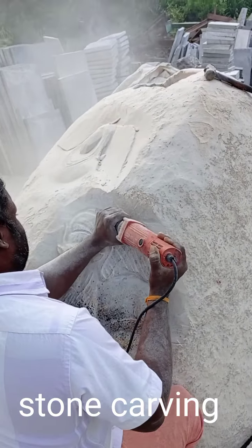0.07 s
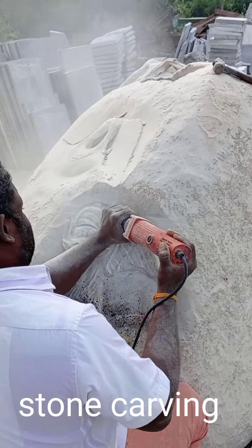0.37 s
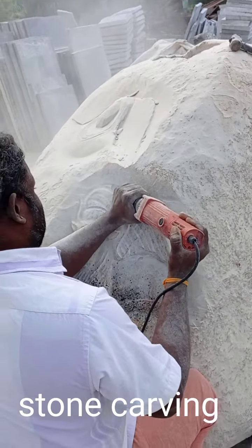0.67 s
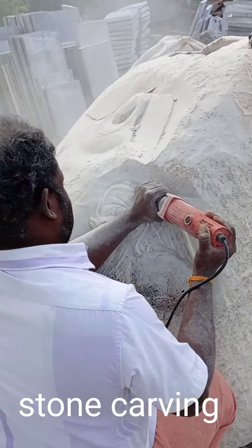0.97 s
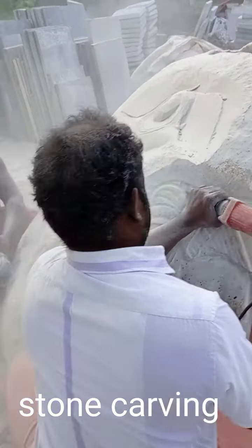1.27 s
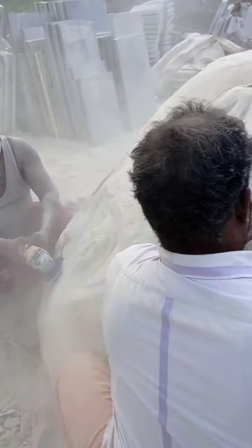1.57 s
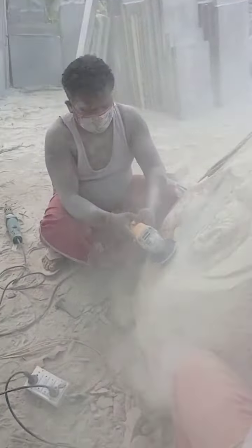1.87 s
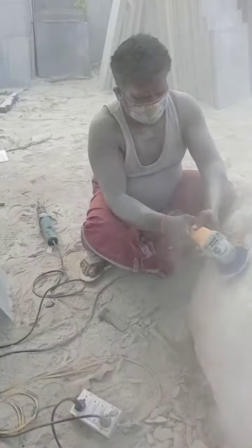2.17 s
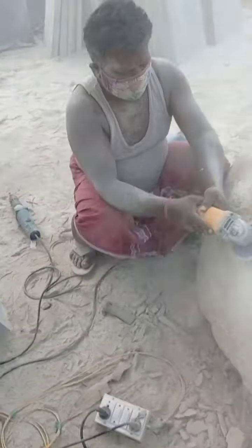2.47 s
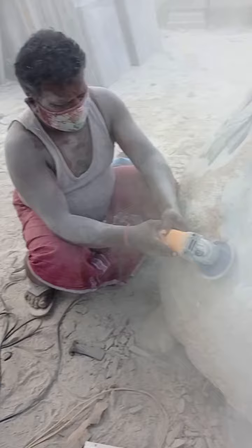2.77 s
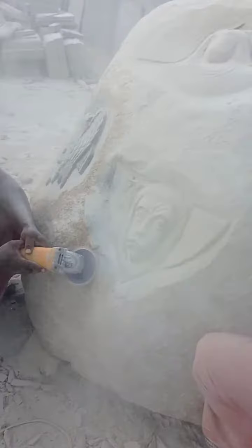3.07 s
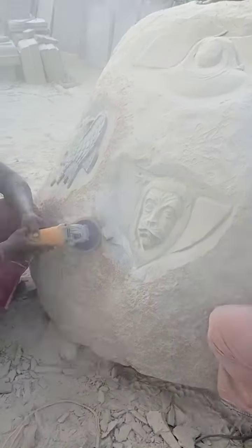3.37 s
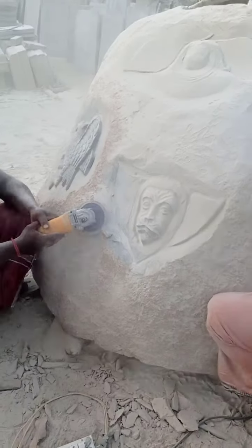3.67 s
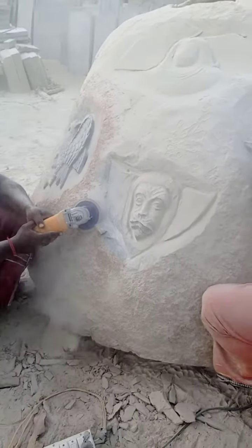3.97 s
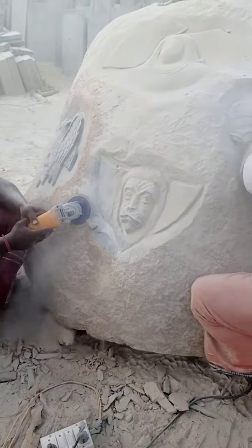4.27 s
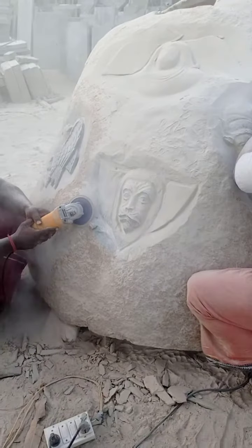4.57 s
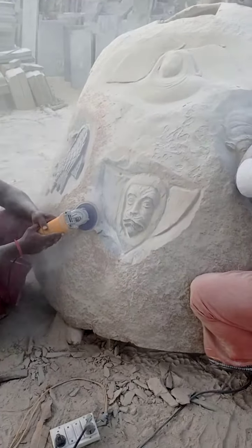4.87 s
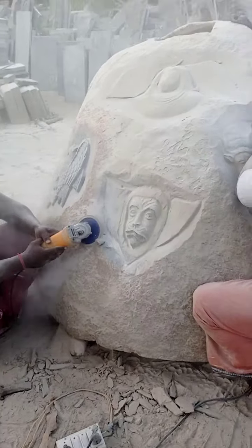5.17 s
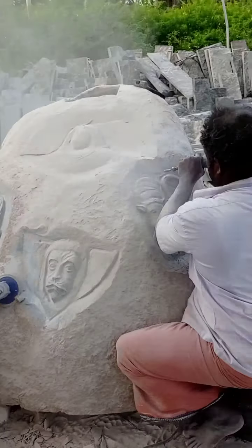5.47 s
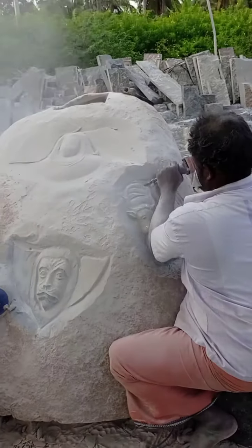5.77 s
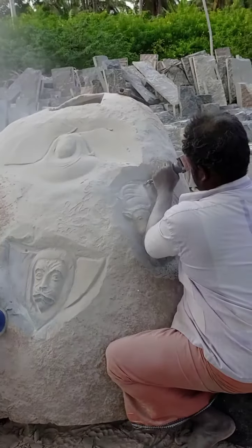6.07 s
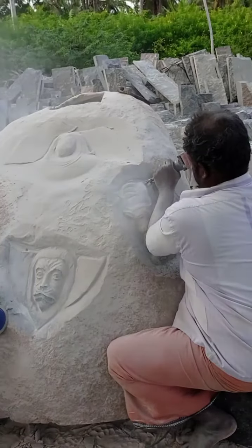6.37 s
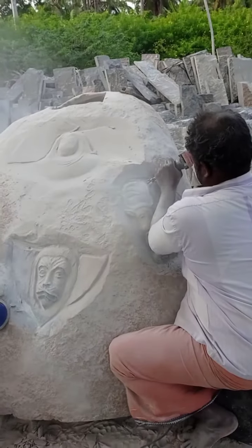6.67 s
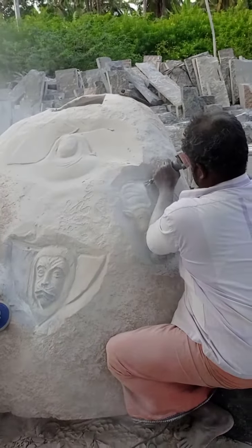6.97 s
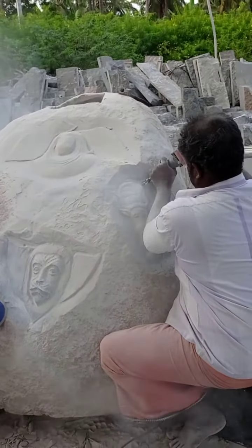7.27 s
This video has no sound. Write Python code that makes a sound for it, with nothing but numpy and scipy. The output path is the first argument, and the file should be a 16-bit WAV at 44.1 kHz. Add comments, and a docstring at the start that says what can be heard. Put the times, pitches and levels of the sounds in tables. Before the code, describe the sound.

Electric angle grinders whine and scrape on a boulder outdoors, with squealing discs and gritty dust spraying against the microphone.

```python
"""A small angle grinder whines close by, over a main one scraping a boulder and a third further off.
The phone walks round the stone carvers in an open yard: after a second it leaves the small grinder
and enters the main one's spray of dust and air. Motors and gears whine and sag under load;
the pressure of the disc on the stone drives the scrape, the ring of the disc and the spray."""
import sys
import numpy as np
from scipy import signal
from scipy.fft import rfft, irfft
from scipy.io import wavfile
from scipy.ndimage import uniform_filter1d, map_coordinates

SR = 44100
rng = np.random.default_rng(int(sys.argv[2]) if len(sys.argv) > 2 else 0)


def to_wav(sig):
    """Store sig (one row per channel, or 1-D mono) as 16-bit WAV at the path in sys.argv[1].

    Samples outside -1..1 are clipped; the rate is SR.
    """
    pcm = np.clip(np.atleast_2d(sig), -1, 1) * 32767
    pcm = np.round(pcm).astype(np.int16)
    wavfile.write(sys.argv[1], SR, pcm.T)  # frames by channels


N = 332073
T = np.arange(N) / SR
FREQ_HZ = np.maximum(np.arange(N // 2 + 1) * SR / N, 1)

# small grinder's motor: (time [s], speed [Hz], relative level [dB])
SMALL_MOTOR = [(0, 359, -36), (.2, 356.2, -35), (.6, 351.2, -34), (.92, 349.5, -36), (1.08, 353.6, -38.5),
               (1.4, 347.5, -39.5), (1.6, 346.5, -46)]
# its tones: (multiple of motor speed, relative level [dB])
SMALL_ORDERS = [(1, -29), (2, -21.5), (3, -17), (4, -0.5), (5, -16), (6, -0.5), (7, -4), (7.4, -7),
                (7.9, -1), (12, -10), (21, -25)]
# its fan: (frequency [Hz], relative level [dB])
FAN_SPECTRUM = [(40, -40), (110, -28.5), (240, -27.5), (450, -20), (620, -14.5), (1020, -5.5), (1200, -12),
                (1400, 1.5), (1900, -1), (3900, 0), (4800, -8), (5800, 1.5), (6900, -7.5), (8400, -38),
                (12000, -23)]
# that fan, falling into the boulder's shadow: (time [s], level [dB])
FAN_LEVEL = [(0, -30), (1.2, -30.5), (1.8, -42.5), (7.53, -41.5)]

# main grinder's drive: (time [s], motor speed [Hz], gear whine level [dB])
MAIN_DRIVE = [(0, 375, -42.5), (.42, 373.5, -34.5), (.9, 368, -29), (1.4, 363.5, -28.5),
              (1.7, 364.5, -25.5), (2.05, 360.5, -33), (2.4, 362, -24), (2.75, 364.5, -29),
              (3.15, 369.7, -30.5), (3.5, 375, -37), (3.8, 371.5, -26.5), (4.65, 367.5, -29),
              (5.3, 366.3, -28), (5.68, 364.5, -30.5), (5.95, 366, -28.5), (6.25, 372.3, -30),
              (6.95, 373, -31.5), (7.53, 368.8, -34)]
# its motor whine: (time [s], level [dB])
MOTOR_LEVEL = [(0, -42), (1.15, -40.5), (1.6, -36.5), (2.7, -40.5), (3.5, -36.5), (4.1, -41.5),
               (4.7, -40.5), (5.5, -42.5), (6.2, -45), (6.45, -38.5), (7.53, -39)]
# its gear and motor tones: (multiple of motor speed, relative level [dB])
GEAR_ORDERS = [(18, 2), (36, -31), (40, -20)]
MOTOR_ORDERS = [(7, -3), (11, -4.5), (14, 1.5), (21, 0.5), (23, -19), (25.6, -13)]
# carver's lean on the disc: (time [s], pressure [dB])
LEAN = [(0, -6.5), (.9, -2.5), (1.45, 2), (2.0, 3.5), (2.8, 2), (2.88, -3), (3.42, -2.5), (3.445, 2.5),
        (4.2, 0.5), (4.6, -1.5), (5.0, .5), (5.6, -3), (5.95, 0), (6.2, -3.5), (6.5, -0.5), (7.53, 0.5)]
# disc skips clear: (start [s], length [s], pressure drop [dB], further spray drop [dB])
LIFTS = [(2.906, 0.018, 2.5, 2), (3.056, 0.042, 3.5, 2), (3.202, 0.072, 2.5, 1.5), (3.296, 0.14, 3, 1.5),
         (3.489, 0.019, 4.5, 3.5), (3.594, 0.094, 2.5, 2), (4.23, 0.059, 7, 0), (4.29, 0.061, 1.5, 4),
         (5.559, 0.028, 1.5, 7), (5.646, 0.07, 2.5, 2), (6.055, 0.2, 3.5, 1.5), (6.316, 0.041, 2, 3)]
# grit on stone, with a thin hiss near 14.8 kHz from the microphone port:
# (frequency [Hz], relative level [dB])
SCRAPE_SPECTRUM = [(100, -70), (500, -24.5), (1500, -9.5), (2300, -3), (3800, -1), (4700, -4.5), (5800, 0),
                   (6400, 3.5), (6950, -18.5), (7450, -3.5), (9000, -5), (10600, -8), (12000, -24),
                   (13800, -16), (14800, -6)]

# disc modes, grouped as they ring together: (frequency [Hz], width [Hz], relative level [dB])
LOWEST_MODES = [(2396, 235, 0)]
SECOND_MODES = [(2593, 98, -1), (2774, 660, -9.5)]
MIDDLE_MODES = [(3244, 24, 6), (3310, 310, -6)]
SQUEAL_MODES = [(3545, 90, 13.5), (3870, 1100, -21), (4135, 260, -9.5)]
HIGH_MODES = [(6700, 190, -0.74), (6970, 550, 1.2)]
# rim angle favours one group: (centre [s], half width [s], group, gain [dB])
MODE_SWELLS = [(.11, .03, "lowest", 15), (1.3, 0.17, "lowest", 6.5), (3.574, 0.27, "lowest", 12),
               (4.54, 0.61, "lowest", 13), (6.848, .22, "lowest", 8), (7.35, 0.16, "lowest", 3),
               (.17, .04, "second", 7), (1.219, 0.23, "second", 6.5), (1.326, .025, "second", 10.5),
               (7.35, 0.26, "second", 2.5), (1.9, 0.41, "second", 3.5), (3.65, 1, "second", 6.5),
               (4.95, 0.54, "second", 5), (1.701, 0.31, "middle", 4), (2.5, 0.28, "middle", 7),
               (3.33, 0.56, "middle", 6.5), (6.5, 0.66, "middle", 6), (1.151, .3, "squeal", 2),
               (2.725, 0.27, "squeal", 5.5), (3.833, 0.23, "squeal", 6.5), (4.547, 0.23, "squeal", 8.5),
               (5.123, 0.38, "squeal", 10.5), (5.797, 0.34, "squeal", 6.5), (6.756, 0.31, "squeal", 5),
               (7.403, 0.26, "squeal", 9), (1.678, 0.41, "high", 5.5), (2.601, 0.2, "high", 7),
               (3.838, 0.92, "high", 7), (4.653, 0.19, "high", 8)]

# far grinder: (time [s], whine [Hz], upper partials' level [dB])
FAR_WHINE = [(0, 5460, -46), (.75, 5490, -38), (1.45, 5545, -29), (2.05, 5660, -42), (2.55, 5595, -36),
             (3.0, 5470, -56), (3.6, 5450, -56), (4.2, 5500, -34), (5.0, 5540, -36.5), (5.3, 5550, -26.5),
             (5.6, 5537, -30), (6.0, 5520, -32.5), (6.45, 5440, -43), (7.53, 5525, -51)]
# its upper partials: (multiple of whine frequency, relative level [dB])
FAR_PARTIALS = [(1.153, 0), (1.466, -11), (1.628, -17), (2.06, -24)]
# its disc catches: (centre [s], half width [s], gain [dB])
FAR_FLARES = [(.55, 0.28, 8), (2.15, 0.48, 10), (2.747, 0.22, 7), (3.95, .15, 5), (5.55, 0.29, 13),
              (5.966, .11, 15.5), (6.464, 0.14, 11)]

# disc squeals and flares of the grinders' motor and gear whine:
# (centre [s], half width [s], frequency [Hz], level [dB])
BRIEF_TONES = [(0.4, 0.036, 1393, -32), (0.423, .1, 5260, -33), (1.059, 0.028, 6600, -21),
               (1.898, 0.53, 2600, -32.5), (2.25, 0.085, 5060, -25.5), (2.677, 0.23, 4030, -32),
               (2.868, 0.068, 5130, -32), (4.603, 0.036, 3500, -25.5), (6.85, 0.14, 5260, -38)]
# how squarely the spray meets the phone: (time [s], gain [dB])
SPRAY_AIM = [(0, -27), (1.1, -10), (1.4, -4), (1.95, -2.5), (2.3, 2), (2.8, 3), (2.84, 1.5), (3.5, -2),
             (4.1, -0.5), (4.6, 0.5), (5.0, 1), (6.2, -.5), (7.53, -1)]
# dust and air hitting the phone: (frequency [Hz], relative level [dB])
DUST_SPECTRUM = [(60, -35), (300, -8), (700, -1), (1300, 0), (1900, -4.5), (3000, -5.5), (6000, -7.5),
                 (11000, -18), (13500, -15), (14800, -10.5)]
AIR_SPECTRUM = [(20, -31), (45, -15), (70, -8), (110, -2), (300, -0.5), (600, -3), (1200, -16.5),
                (3000, -36)]
# right channel's phase lead over the left, bass centred: (frequency [Hz], phase [rad])
STEREO_PHASE = [(0, 0), (450, .01), (750, .08), (1800, .1), (2500, .36), (6600, .95), (10500, 1.5),
                (15000, 2.15)]


def undb(db):
    """Decibels to gain."""
    return 10 ** (np.asarray(db) / 20)


def unit(x):
    """Scale to rms 1."""
    return x / np.std(x)


def curves(table):
    """Columns of a timed table, per sample."""
    time_s, *columns = np.transpose(table)
    return [np.interp(T, time_s, column) for column in columns]


def bell(centre_s, half_s):
    """Gaussian rise to 1 and fall."""
    return np.exp(-np.minimum(((T - centre_s) / half_s) ** 2, 20))


def gate(start_s, length_s, edge_s=0.007):
    """1 inside the span, with linear edges."""
    return np.clip(.5 + np.minimum(T - start_s, start_s + length_s - T) / edge_s, 0, 1)


def colour(x, spectrum):
    """Filter by (Hz, dB) points; rms 1."""
    hz, db = np.transpose(sorted(spectrum))
    response = undb(np.interp(np.log(FREQ_HZ), np.log(hz), db))
    return unit(irfft(rfft(x) * response, N))


def walk(rate_hz):
    """Random drift, low-passed at rate_hz; rms 1."""
    lowpass = signal.butter(2, rate_hz, fs=SR / 20, output="sos")
    coarse = signal.sosfilt(lowpass, rng.standard_normal(N // 20 + 2))
    return unit(np.interp(np.arange(N) / 20, np.arange(len(coarse)), coarse))


def shaft_rad(hz):
    """Angle of a shaft spinning at hz."""
    return 2 * np.pi * np.cumsum(hz) / SR


def grains(per_s, spread_db):
    """Dense random impacts of uneven size."""
    hits = rng.random(N) < per_s / SR
    return unit(hits * rng.standard_normal(N) * undb(spread_db * rng.standard_normal(N)))


def whine(hz, orders, jitter, jitter_hz, flutter_db, flutter_hz, smear_rad):
    """Tones locked to a shuddering shaft; each flutters and smears as the tool shakes."""
    angle_rad = shaft_rad(hz * (1 + jitter * walk(jitter_hz)))
    tones = np.zeros(N)
    for order, db in orders:
        flutter = undb(flutter_db * walk(flutter_hz))
        tone = np.sin(order * angle_rad + smear_rad * walk(flutter_hz))
        tones += undb(db) * unit(flutter * tone)
    return tones


def small_grinder():
    """Lightly loaded motor and fan; the boulder cuts off the whine and shadows the fan."""
    motor_hz, motor_db = curves(SMALL_MOTOR)
    in_view = np.interp(T, [1.2, 1.8], [1, 0])
    motor = whine(motor_hz, SMALL_ORDERS, jitter=0.0024, jitter_hz=40.6,
                  flutter_db=2.5, flutter_hz=30, smear_rad=0.37)
    motor *= undb(motor_db - 1 + walk(7.2))
    fan = colour(rng.standard_normal(N), FAN_SPECTRUM) * undb(curves(FAN_LEVEL)[0])
    return in_view * motor + fan


def main_grinder(gear_ratio=3):
    """Geared disc on stone: it bites harder once a turn and chatters over the rough face."""
    motor_hz, gear_db = curves(MAIN_DRIVE)
    press_db = pressure_db()
    drive = drive_whine(motor_hz, gear_db)
    bite = undb(0.61 * np.sin(shaft_rad(motor_hz / gear_ratio)) + 1.13 * walk(40))
    return drive + scrape(bite, press_db) + disc_ring(bite, press_db) + spray(bite, press_db)


def pressure_db(rock_db=0.86, rock_hz=14):
    """The carver's lean and rocking hand, less the moments the disc skips clear."""
    lift_db = sum(drop_db * gate(start_s, length_s) for start_s, length_s, drop_db, _ in LIFTS)
    return curves(LEAN)[0] + rock_db * walk(rock_hz) - lift_db


def drive_whine(motor_hz, gear_db, free_speed_hz=376, full_sag_hz=15):
    """Gear and motor tones, rougher as the speed sags under load."""
    load = np.clip((free_speed_hz - motor_hz) / full_sag_hz, 0, 1)
    gears = whine(motor_hz, GEAR_ORDERS, jitter=0.001617, jitter_hz=45.2,
                  flutter_db=3.0, flutter_hz=38.6, smear_rad=0.54 + 0.59 * load)
    gears *= undb(gear_db + walk(4.2))
    motor = whine(motor_hz, MOTOR_ORDERS, jitter=0.001525, jitter_hz=49.7,
                  flutter_db=4.5, flutter_hz=24.7, smear_rad=0.72 + 0.71 * load)
    motor *= undb(curves(MOTOR_LEVEL)[0] + 1.6 * walk(2.7))
    return gears + motor


def scrape(bite, press_db):
    """Grit strikes the stone, with a thin microphone-port hiss on top; amplitude follows pressure."""
    grit = bite * grains(per_s=25000, spread_db=1.6)
    return colour(grit, SCRAPE_SPECTRUM) * undb(press_db - 28.5)


def mode_ring(bite, modes, limiting, drift_ms):
    """Grit drives a group of disc modes; friction limits their swing, uneven contact bends their pitch."""
    response = sum(undb(db) / (1 + (2 * (FREQ_HZ - hz) / width_hz) ** 2) for hz, width_hz, db in modes)
    radiation = 1 / (1 + (1200 / FREQ_HZ) ** 3)  # a small disc radiates no bass
    grit = bite * grains(per_s=12000, spread_db=1.7)
    ring = unit(irfft(rfft(grit) * response * radiation, N))
    swing = np.sqrt(np.abs(uniform_filter1d(ring ** 2, size=900)) + 0.024)
    read_at = np.arange(N) + drift_ms * SR / 1000 * walk(4.36)  # drifting delay bends pitch
    return unit(map_coordinates(ring / swing ** limiting, [read_at], order=3, mode="reflect"))


def disc_ring(bite, press_db):
    """Each mode group rings with pressure, wavers and swells when the rim favours it."""
    def group(name, modes, limiting, drift_ms, base_db, waver_db):
        ring = mode_ring(bite, modes, limiting, drift_ms)
        swell_db = sum(db * bell(centre_s, half_s)
                       for centre_s, half_s, favoured, db in MODE_SWELLS if favoured == name)
        return ring * undb(base_db + 0.63 * press_db + swell_db + waver_db * walk(13.8))

    return (group("lowest", LOWEST_MODES, limiting=0.092, drift_ms=0.095, base_db=-43.5, waver_db=2.5)
            + group("second", SECOND_MODES, limiting=0.082, drift_ms=0.318, base_db=-35, waver_db=1.5)
            + group("middle", MIDDLE_MODES, limiting=0.25, drift_ms=0.22, base_db=-34.5, waver_db=1.7)
            + group("squeal", SQUEAL_MODES, limiting=0.55, drift_ms=0.242, base_db=-34, waver_db=1.5)
            + group("high", HIGH_MODES, limiting=0.1, drift_ms=0.132, base_db=-37.5, waver_db=1))


def far_grinder(base_db=-43.5, waver_db=2.5):
    """Another carver's tool: only its whine carries, flaring as the disc catches."""
    whine_hz, upper_db = curves(FAR_WHINE)
    flare_db = sum(db * bell(centre_s, half_s) for centre_s, half_s, db in FAR_FLARES)
    lower_db = base_db + waver_db * walk(27) + flare_db
    lower = whine(whine_hz, [(1, 0)], jitter=0.00134, jitter_hz=60,
                  flutter_db=3.0, flutter_hz=30.2, smear_rad=1.0)
    upper = whine(whine_hz, FAR_PARTIALS, jitter=0.00155, jitter_hz=59.6,
                  flutter_db=3.5, flutter_hz=30, smear_rad=0.56)
    return lower * undb(lower_db) + upper * undb(upper_db)


def brief_tones():
    """Brief swelling tones: disc squeals and flares of the grinders' motor and gear whine."""
    shudder_rad = 0.79 * walk(58)
    flutter = undb(2.5 * walk(45))
    tones = sum(np.sin(2 * np.pi * hz * T + shudder_rad) * undb(db) * bell(centre_s, half_s)
                for centre_s, half_s, hz, db in BRIEF_TONES)
    return np.sqrt(2) * flutter * tones


def spray(bite, press_db):
    """Dust and air flung off the rim hit the phone once it has rounded the boulder."""
    starved_db = sum(drop_db * gate(start_s, length_s) for start_s, length_s, _, drop_db in LIFTS)
    flow_db = 1.33 * press_db + curves(SPRAY_AIM)[0] - starved_db
    dust = colour(bite * grains(per_s=4500, spread_db=2.35), DUST_SPECTRUM)
    air = colour(bite * grains(per_s=2500, spread_db=1.8), AIR_SPECTRUM)
    air_fade_db = .85 * np.minimum(flow_db + 3.5, 0)  # buffeting dies faster than dust
    return dust * undb(flow_db - 37) + air * undb(flow_db - 44.5 + air_fade_db)


def yard_scatter(x, t60_s, wet_db):
    """Stacked slabs scatter the treble back, differently on each side."""
    time_s = T[:8000]
    tails = rng.standard_normal((2, len(time_s))) * undb(-60 * time_s / t60_s) * (time_s > .004)
    tails /= np.sqrt(np.sum(tails ** 2, axis=1, keepdims=True))
    treble = irfft(rfft(x) / (1 + (3500 / FREQ_HZ) ** 4), N)
    return undb(wet_db) * signal.fftconvolve(treble[None], tails, axes=1)[:, :N]


def scene():
    """Three grinders in the yard, in stereo; the left channel's treble lags slightly."""
    tools = main_grinder() + brief_tones() + far_grinder() + small_grinder()
    lag_rad = np.interp(FREQ_HZ, *np.transpose(STEREO_PHASE))
    left = irfft(rfft(tools) * np.exp(-1j * lag_rad), N)
    return np.array([left, tools]) + yard_scatter(tools, t60_s=0.16, wet_db=-7.5)


def record(dry):
    """The phone cuts off above 15.3 kHz."""
    return signal.sosfilt(signal.ellip(10, .2, 80, 15300, fs=SR, output="sos"), dry)


dry = scene()
out = record(dry)
to_wav(out)
```